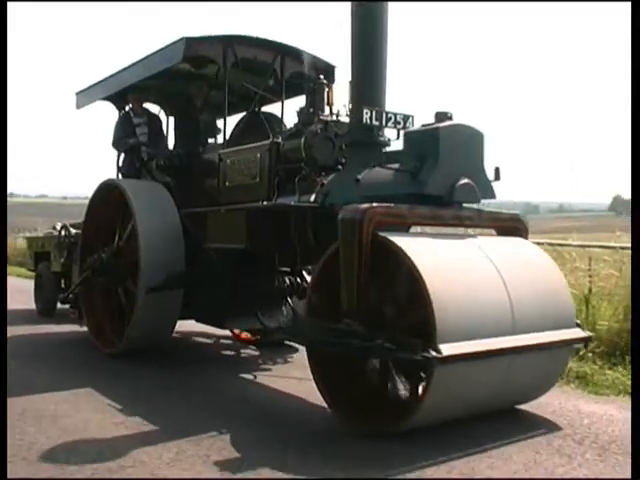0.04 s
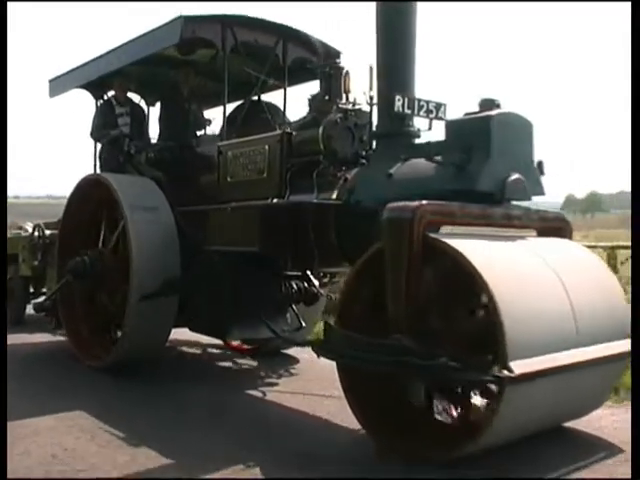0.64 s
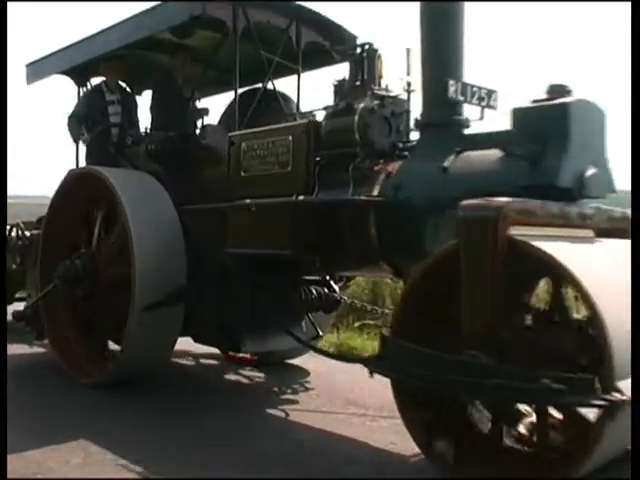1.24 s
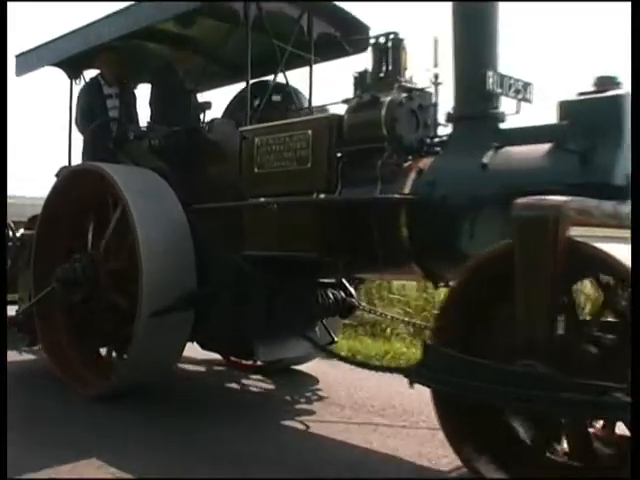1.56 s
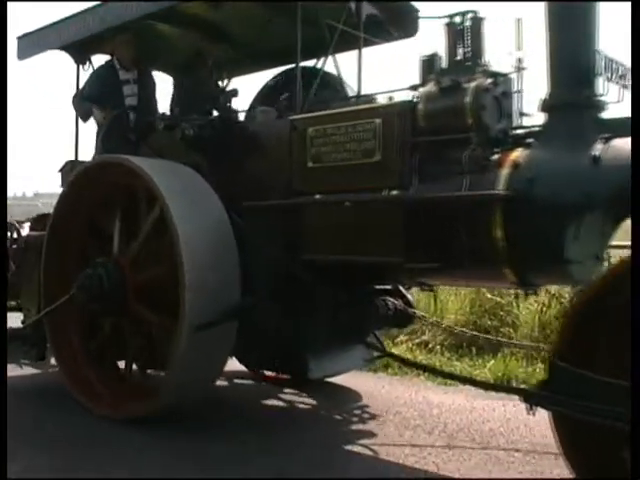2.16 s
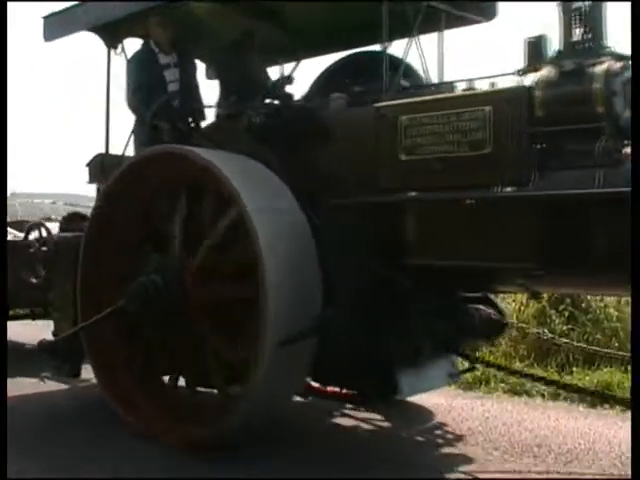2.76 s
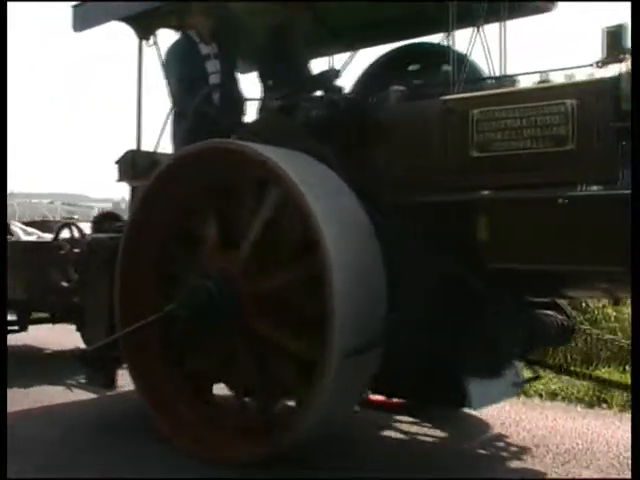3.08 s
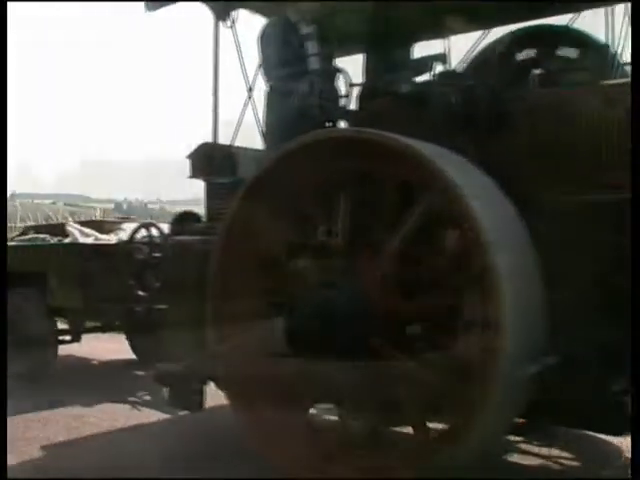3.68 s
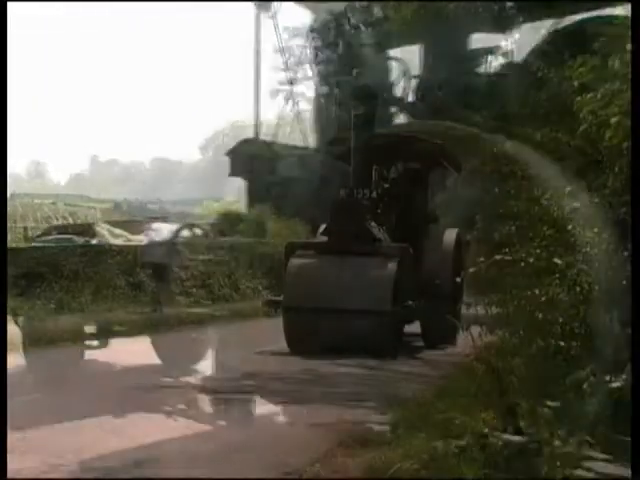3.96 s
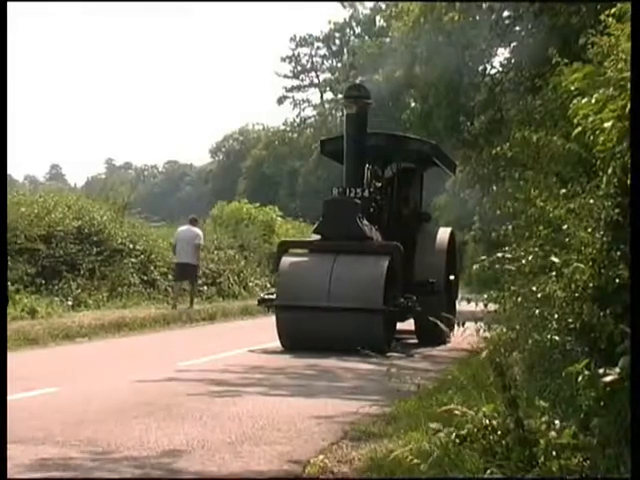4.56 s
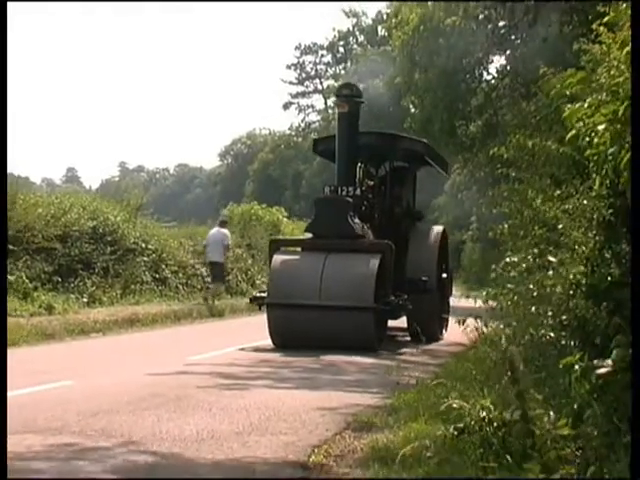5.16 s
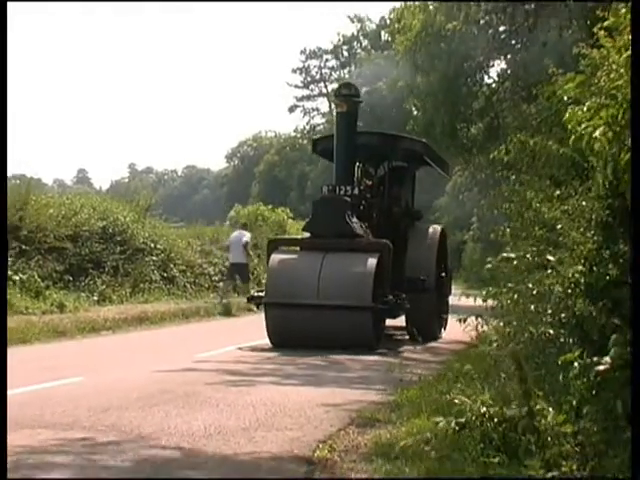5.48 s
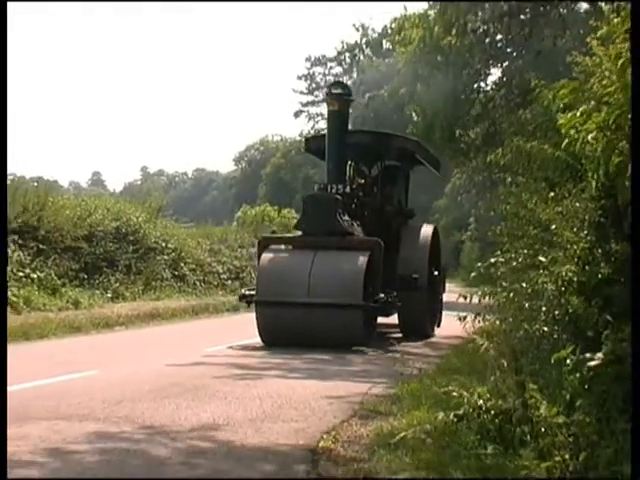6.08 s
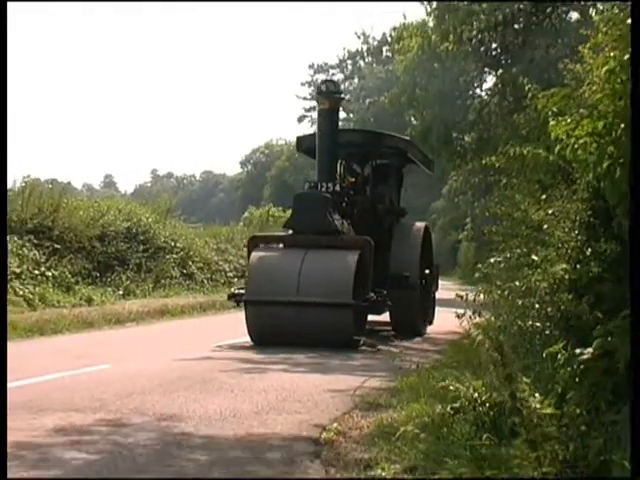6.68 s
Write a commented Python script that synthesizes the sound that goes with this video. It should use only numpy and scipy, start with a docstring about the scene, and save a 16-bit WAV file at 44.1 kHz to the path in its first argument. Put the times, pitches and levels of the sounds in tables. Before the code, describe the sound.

A steam roller is already passing close by on a country road. Its exhaust thumps and hisses in strong and weak pairs, about three and a half pairs a second. Open gears clatter and ring, rods knock in time, and iron rolls rumble on the asphalt. Between 0.4 and 1.7 seconds the front roll gives several hollow bumps, with two tiny stone snaps near 0.8 seconds. A gear wheel clangs at about 2.4 seconds. The gearing drifts slightly from left to right as the rear roll's low drone swells, peaking around 3.3 seconds, with hard metallic jolts at 3.0, 3.4 and 3.6 seconds. From about 3.7 to 4.4 seconds the sound cross-fades to the roller approaching from farther off. Clatter and rumble are quieter, while the slightly quicker chuffs carry a short echo from the hedges. The hiss grows a little near 5.7 seconds, and the rhythm continues until about 7 seconds.

```python
"""A steam roller passes close by on a country road. From the start, open gears clatter and chime, iron
rolls rumble on the asphalt and rods knock. Each turn of the crank gives a strong and a weak exhaust
beat that excite the chimney's resonances. The front roll bumps and cracks stones, a gear wheel clangs,
and the rear roll drones past amid hard jolts. Around 4 s a cross-fade leads to the roller approaching
from farther off, its exhaust echoed by the hedges."""
import sys
import numpy as np
from scipy import signal
from scipy.fft import rfft, irfft
from scipy.io import wavfile
from scipy.ndimage import uniform_filter1d

SR = 44100
rng = np.random.default_rng(int(sys.argv[2]) if len(sys.argv) > 2 else 0)


def generate_wav(signal):
    """Clip the signal to [-1, 1] and save it as 16-bit WAV at the path in sys.argv[1]."""
    frames = np.transpose(np.atleast_2d(signal))
    scaled = np.clip(frames, -1, 1) * 32767
    pcm = np.round(scaled).astype(np.int16)
    wavfile.write(sys.argv[1], SR, pcm)


N = 305613
TIME = np.arange(N) / SR
FADE_START_S, FADE_END_S = 3.65, 4.35  # from the near view to the far one
RETURN_SHARE = 0.456  # share of a turn at which the return stroke exhausts

# remoteness of the roller: t/s, distance (0 alongside to 1 down the road)
DISTANCE = [(0, 0.15), (3.6, 0.065), (4.4, 1), (6.93, 1)]
# strength of the running gear: t/s, clatter level/dB, rumble level/dB
RUNNING = [(0.0, -17.5, -21.5), (0.19, -24, -22.5), (1.93, -24, -20), (2.33, -21.5, -18.5),
           (3.57, -22, -21), (3.8, -23.5, -20), (4.5, -30.5, -29), (5.17, -29.5, -30.5), (6.62, -31, -29.5),
           (6.93, -29, -30)]
# spectrum of the clatter: f/Hz, level/dB
CLATTER = [(300, -24), (620, -23.5), (830, -2.5), (1100, 3), (1350, 1.5), (1570, 0.5), (1950, -5.5),
           (2550, -4), (2950, -4.5), (3450, -4.5), (4500, -13), (7000, -19.5), (11000, -25), (15500, -22.5)]
# modes of the gear wheels: f/Hz, level/dB, T60/s
GEAR_MODES = [(2575, 1.5, 0.055), (2720, -2.5, 0.014), (3320, 5, 0.017), (5525, -5, .026),
              (6355, -8.5, 0.026), (7845, -18.5, 0.06), (8790, -14, .02), (9530, -21, 0.055),
              (10490, -24.5, 0.065), (13435, -18, 0.036), (14670, -19.5, .04)]


def amp(db):
    return 10 ** (np.asarray(db) / 20)


def unit_rms(x):
    return x / np.sqrt(np.mean(x ** 2) + 1e-20)


def follow(rows, at, column=1):
    """Linear interpolation of one column of a table."""
    rows = np.array(rows)
    return np.interp(at, rows[:, 0], rows[:, column])


def add(mix, s, sound):
    """Superposition of a sound starting at s seconds."""
    part = mix[max(round(s * SR), 0):][:len(sound)]
    part += sound[:len(part)]


def colour(x, spectrum, size=4096):
    """Minimum-phase filtering by a spectrum of (f/Hz, level/dB)."""
    hz, db = np.transpose(spectrum)
    log_hz = np.log(abs(np.fft.fftfreq(size, 1 / SR)) + 1)
    log_gain = np.log(amp(np.interp(log_hz, np.log(hz), db)))
    taps = np.fft.ifft(np.exp(np.conj(signal.hilbert(log_gain)))).real
    return signal.fftconvolve(x, taps[:size // 2])[:len(x)]


def free_decay(t, modes, sustain=1):
    """Free vibration: a damped sinusoid for each mode (f/Hz, level/dB, T60/s)."""
    return sum(amp(db - 60 * t / (t60 * sustain)) * np.sin(2 * np.pi * hz * t) for hz, db, t60 in modes)


def ring(x, modes):
    """Forced vibration: convolution with the modes' unit-energy impulse response."""
    response = free_decay(TIME[:SR // 3], modes)
    return signal.fftconvolve(x, response / np.linalg.norm(response))[:len(x)]


def swell(t, rise, hold, fall):
    """Linear attack, then exponential decay from the time `hold`; all in seconds."""
    return np.clip(t / rise, 0, 1) * np.exp(-np.maximum(t - hold, 0) / fall)


def impacts(per_s, spread_db):
    """A Poisson train of blows of uneven size."""
    blows = (rng.random(N) < per_s / SR) * rng.choice([-1, 1], N)
    return blows * amp(spread_db * np.minimum(rng.exponential(1, N), 4))


def crank_times(turns):
    """Rotation with a drifting period: when the crank reaches these angles, near and far."""
    # near and far view: first strong beat t/s, period/s, drift/(s per turn squared)
    crank = [(0.0826, 0.2865, -0.00118), (4.0892, 0.2691, 0.00008)]
    return [first + turns * (period + drift * turns) for first, period, drift in crank]


def crank_turns(count=18):
    """Phase of the crank in turns, whole at each strong beat."""
    turns = np.arange(-1, count)
    near, far = (np.interp(TIME, times, turns) for times in crank_times(turns))
    return np.where(TIME < (FADE_START_S + FADE_END_S) / 2, near, far)


def strokes(share, count=18):
    """Periodic events at one share of a turn, cross-faded in power: (t/s, gain)."""
    rows = []
    near_power, far_power = [0.96, 0.01], [0.31, 0.69]  # before and after the fade
    for times, power in zip(crank_times(np.arange(count) + share), (near_power, far_power)):
        rows += zip(times, np.sqrt(np.interp(times, [FADE_START_S, FADE_END_S], power)))
    return [(s, gain) for s, gain in rows if gain > 0 and s < N / SR]


def gears(teeth=18, clatter_db=2.5, chime_db=-1, blow_spread_db=6, clink_spread_db=4):
    """Impact excitation: teeth meet with uneven force, rattling the casing and ringing the wheels."""
    # chime radiated towards the listener: t/s, level/dB relative to the clatter
    chime = [(0, -12), (1.2, -8.5), (2.4, -10), (3, -11.5), (3.7, -12), (4.2, -7), (4.6, -11.5), (6.93, -7)]
    turns = crank_turns()
    meetings = np.diff(np.floor(turns * teeth), prepend=0) > 0
    # the clatter swells twice a turn, dipping after each chuff, loudest at the weak beat
    surge = amp(0.2 * np.cos(4 * np.pi * (turns - 0.47))
                + 0.44 * np.cos(2 * np.pi * (turns - RETURN_SHARE)))
    rattle = swell(TIME[:SR // 10], rise=0.0013, hold=0.0094, fall=0.014)
    forces = (meetings * amp(db * np.clip(rng.standard_normal(N), -2, 2))
              for db in (blow_spread_db, clink_spread_db))
    blows, clinks = (unit_rms(signal.fftconvolve(force, rattle)[:N]) for force in forces)
    casing = unit_rms(colour(surge * (0.77 + blows) * impacts(per_s=9000, spread_db=0.5), CLATTER))
    # the wheels chime most when the clatter peaks
    wheels = unit_rms(ring(surge ** 3 * clinks * impacts(per_s=4000, spread_db=5), GEAR_MODES))
    guard_modes = [(1134, 0, 0.047), (1564, 2, 0.036), (1610, -2, 0.045)]  # sheet covers over the gears
    guards = unit_rms(ring(surge * blows * impacts(per_s=1500, spread_db=0), guard_modes))
    clatter = amp(-3.5) * casing + amp(-11.5) * guards
    # from the front, the boiler and roll screen part of the gearing
    screened = colour(clatter, [(500, 1), (1100, -6), (1700, 0.5), (2000, -3.5), (2700, 0),
                                (3400, 1), (5000, 2), (9000, 3), (15000, -4)])
    far = follow(DISTANCE, TIME)
    clatter = (1 - far) * clatter + far * screened
    wheels *= amp(follow(chime, TIME) + chime_db)
    return amp(follow(RUNNING, TIME) + clatter_db) * (clatter + wheels)


def rolls(ring_db=-3, far_ring_db=-3, bump_db=-6):
    """Rolling noise: crushed grit gives a broad rumble; the hollow drums resonate and boom at bumps."""
    # spectrum of the rumble on asphalt: f/Hz, level/dB
    road_spectrum = [(15, -38), (35, 2.5), (70, -0.5), (120, 4.5), (250, -3.5), (330, -12), (450, -13),
                     (620, -33.5), (1200, -38.5)]
    # modes of the rolls and frame: f/Hz, level/dB, T60/s
    drum_modes = [(99, -3, 0.18), (126.1, 1, 0.41), (210.7, -7.5, 0.22), (229.8, -1.5, 0.11),
                  (278.6, -2, 0.15), (368, -13, 0.21), (455, -23, 0.05)]
    # bumps under the front roll: t/s, level/dB
    bumps = [(0.437, -8.5), (0.793, -10), (0.908, -6.5), (0.968, -6), (1.374, -6), (1.664, -11.5)]
    road = unit_rms(colour(impacts(per_s=500, spread_db=1.5), road_spectrum))
    drums = unit_rms(ring(impacts(per_s=300, spread_db=0.5), drum_modes))
    drums *= amp(ring_db + far_ring_db * follow(DISTANCE, TIME))
    out = amp(follow(RUNNING, TIME, column=2)) * (road + drums)
    boom = free_decay(TIME[:SR // 5], drum_modes)
    boom = colour(boom, [(90, -34), (150, -10), (210, 5.5), (260, 2.5), (400, -12), (1500, -12)])
    for s, db in bumps:
        add(out, s, amp(db + bump_db) * boom / abs(boom).max())
    return out


def rear_roll():
    """Random forcing by grit sustains the resonances of the wide iron rim."""
    # drone of the tall roll going by: t/s, level/dB
    passage = [(0, -32), (2, -30), (2.7, -27), (3.3, -21.5), (3.9, -26), (4.4, -46.5), (6.93, -39.5)]
    # modes of the rim: f/Hz, level/dB, T60/s
    rim_modes = [(211.3, -6.5, 0.16), (278.5, 0.5, 0.23), (301, -3.5, 0.096), (360.4, -7, 0.12),
                 (400, -20, 0.54), (482, -13.5, 0.17), (518, -25.5, 0.06)]
    return amp(follow(passage, TIME)) * unit_rms(ring(impacts(per_s=400, spread_db=1.5), rim_modes))


def background(level_db=-35):
    """Stationary low-frequency noise: a deep outdoor rumble."""
    spectrum = [(12, -24), (35, 2), (70, -5), (150, -24), (700, -42), (3000, -60)]
    return amp(level_db) * unit_rms(colour(rng.standard_normal(N), spectrum))


def knocks(knock_db=-15, ring_db=1, spread_db=1, far_db=-6):
    """Backlash: slack in rods and gears closes in a burst of blows, thrice a turn and at each jolt."""
    # single jolts of frame and gearing: t/s, knock level/dB, gear ring level/dB
    jolts = [(0.039, -16.5, -25), (0.609, -19, -28), (3.005, -8, -20), (3.169, -23, -27), (3.394, 0, -20),
             (3.5556, 2, -17), (5.88, -14, -27)]
    # where slack closes: share of a turn, knock level/dB, gear ring level/dB (relative to the clatter)
    backlash = [(0.355, 20, 1), (0.46, 9, -1), (0.668, 11.5, -10)]
    body, chime, t = np.zeros(N), np.zeros(N), TIME[:SR // 8]
    blows = list(jolts)
    for share, db, chime_db in backlash:
        for s, gain in strokes(share):
            force_db = follow(RUNNING, s) + far_db * follow(DISTANCE, s) + 20 * np.log10(gain)
            force_db += spread_db * rng.standard_normal()
            blows.append((s, db + force_db, chime_db + force_db))
    for s, db, chime_db in blows:
        add(body, s, amp(db) * swell(t, rise=0.0072, hold=0.0024, fall=0.02))
        add(chime, s, amp(chime_db) * swell(t, rise=0.00023, hold=0.0074, fall=0.0058))
    body_noise, chime_noise = rng.standard_normal((2, N))
    knock = amp(knock_db) * body * unit_rms(colour(body_noise, CLATTER))
    return knock + amp(ring_db) * ring(chime * chime_noise, GEAR_MODES)


def beats(share, near_db, far_db, spread_db=0.5):
    """Periodic exhaust, one slightly uneven beat a turn: (t/s, thump, hiss and pipe ring level/dB)."""
    # exhaust at the listener: t/s, thump level/dB, hiss level/dB, blast pipe ring level/dB
    exhaust = [(0, -3.5, -24.5, -17.5), (1.2, -5, -26, -16), (2.2, -4, -26, -17.5), (3.35, -4.5, -30, -16),
               (3.75, -6.5, -32.5, -21.5), (4.5, -7.5, -31.5, -27.5), (5.7, -8.5, -25.5, -19.5),
               (6.93, -7, -27, -21)]
    rows = []
    for s, gain in strokes(share):
        db = near_db + (far_db - near_db) * follow(DISTANCE, s) + 20 * np.log10(gain)
        db += spread_db * rng.standard_normal()
        rows.append((s, *(follow(exhaust, s, column) + db for column in (1, 2, 3))))
    return rows


def thumps(strong, weak, round_trip_s=0.01333, overtone_hz=142, weak_trim_db=1.5):
    """Reflection in a pipe: each steam pulse runs up and down the chimney, fading and broadening."""
    out, early_s, lead_s = np.zeros(N), 0.02, 0.0041
    t = TIME[:SR // 5] - early_s
    # push, suction and rebound: amplitude, t/s, width/s
    lobes = ((0.68, -lead_s, 0.0013), (-1, 0, 0.0023), (0.48, 0.0031, 0.0018))
    # the chimney's second mode hums on after the pulse
    hum = -np.cos(2 * np.pi * overtone_hz * t) * swell(t + lead_s, rise=0.0022, hold=0.019, fall=0.035)
    for rows, trim_db in ((strong, 0), (weak, weak_trim_db)):
        for s, db, *_ in rows:
            far = follow(DISTANCE, s)
            reflection = 0.37 + 0.42 * far
            wave = (0.023 + 0.21 * far) * hum
            for trip in range(5):
                age, blur = t - trip * round_trip_s, 1 + 0.15 * trip
                pulse = sum(size * np.exp(-0.5 * ((age - at) / (width * blur)) ** 2)
                            for size, at, width in lobes)
                wave += reflection ** trip * pulse
            add(out, s - early_s, amp(db + trim_db) * wave)
    return out


def chuffs(strong, weak, pipe_db=2, far_pipe_db=2, weak_hiss_db=-27, gulp_db=-15, flutter_db=1):
    """Turbulent jet noise: escaping steam hisses and drives the modes of blast pipe and chimney."""
    # spectrum of the steam jet: f/Hz, level/dB
    steam_spectrum = [(100, -38), (350, 16), (560, -23.5), (850, 4), (1200, 6.5), (1450, -24), (2100, -7.5),
                      (2900, 8), (3700, 6), (4600, -1), (5800, -6), (7000, -6.5), (11000, -11), (15500, -9)]
    # cross modes of the chimney and blast pipe: f/Hz, level/dB, T60/s
    pipe_modes = [(834, -8, 0.088), (1044, -8.5, 0.064), (1250, -13, 0.046), (2541, 8, 0.045),
                  (2706, 7, 0.032), (3100, 3.5, 0.015), (3350, -1, 0.026), (3700, -26, .016),
                  (4200, -17, 0.021), (4870, -8.5, 0.033), (5730, -5.5, 0.036)]
    hiss, pipe, gulp = np.zeros((3, N))
    t = TIME[:SR // 4]
    valve_opening = np.sin(np.pi / 2 * np.clip(t / 0.013, 0, 1)) ** 2
    for s, _, jet_db, ring_db in strong:
        far = follow(DISTANCE, s)
        puff = valve_opening * swell(t, rise=0.002, hold=0.019, fall=0.024 + 0.0044 * far)
        add(hiss, s - 0.004, amp(jet_db + 7) * puff)
        drive = amp(ring_db + far_pipe_db * far) * swell(t, rise=0.009, hold=0.016, fall=0.014)
        add(pipe, s + 0.00044, drive)
    for s, db, *_ in weak:
        add(hiss, s, amp(db + weak_hiss_db) * swell(t, rise=0.015, hold=0.019, fall=0.15))
    # a low gulp of turbulence in the chimney follows every beat
    for s, db, *_ in strong + weak:
        add(gulp, s, amp(db) * swell(t, rise=0.0093, hold=0.027, fall=0.017))
    jet_noise, pipe_noise, gulp_noise, flutter_noise = rng.standard_normal((4, N))
    flutter = unit_rms(amp(flutter_db * unit_rms(uniform_filter1d(flutter_noise, size=90))))
    jet = hiss * flutter * unit_rms(colour(jet_noise, steam_spectrum))
    # directivity: the chimney mouth beams its upper modes over a near listener's head
    beamed = colour(jet, [(300, -1.5), (600, -11), (850, 0), (1500, 3), (3500, 2),
                          (5600, 4.5), (7000, 2), (15000, -1)])
    far = follow(DISTANCE, TIME)
    jet = (1 - far) * jet + far * beamed
    pipe_ring = ring(pipe * flutter * pipe_noise, pipe_modes)
    chimney = ring(gulp_noise, [(36, -11, 0.33), (77, 17, 0.041), (133.4, 6, 0.1), (231, -38, 0.04)])
    return jet + amp(pipe_db) * pipe_ring + amp(gulp_db) * gulp * unit_rms(chimney)


def hedge_echoes(x, level_db=-8.5, t60=0.22, size=9000):
    """Diffuse reflection: the hedges return a decaying tail, stronger when the source is far off."""
    tail = rng.standard_normal(size) * amp(-60 * TIME[:size] / t60)
    echoes = signal.fftconvolve(x, tail / np.linalg.norm(tail))[:N]
    return amp(level_db) * follow(DISTANCE, TIME) * echoes


def cracks(crack_db=-8):
    """Brittle fracture: a stone splits under the roll with a tiny bright snap."""
    # splitting stones: t/s, level/dB
    stones = [(0.815, -15.5), (0.854, -15)]
    envelope = np.zeros(N)
    snap = swell(TIME[:SR // 30], rise=0.0004, hold=0.001, fall=0.0036)
    for s, db in stones:
        add(envelope, s, amp(db + crack_db) * snap)
    bright_noise = colour(rng.standard_normal(N), [(2000, -18), (5000, 5), (8000, 0), (15000, -20)])
    return envelope * unit_rms(bright_noise)


def clangs():
    """Free vibration: after one clean blow a wheel rings longer than with its teeth engaged."""
    # hard blow on a gear wheel: t/s, peak level/dB
    blows = [(2.411, -6)]
    out, t = np.zeros(N), TIME[:SR // 5]
    wheel = free_decay(t, GEAR_MODES, sustain=1.1) * np.clip(t / 0.015, 0, 1)
    for s, db in blows:
        add(out, s, amp(db) * wheel / abs(wheel).max())
    return out


def stereo(overhead, ground, overhead_share=0.59, centre_hz=570, q=1.87, top_hz=1400):
    """Mid-side stereo: a stereo widener spreads the low mids, leaning right; scattering adds width."""
    # scatter from road and hedges: f/Hz, level/dB relative to the direct sound
    scatter_spectrum = [(40, -14), (150, -11.5), (300, -20), (450, -7.5), (620, 7), (900, -10.5),
                        (2500, -8), (3500, -9.5), (5200, -3.5), (8000, -14), (15000, -12)]
    mid, hz = overhead + ground, np.fft.rfftfreq(N, 1 / SR) + 1
    band_pass = 1 / (1 + 1j * q * (hz / centre_hz - centre_hz / hz))
    side = -irfft(rfft(mid) * band_pass / (1 + 1j * hz / top_hz), N)
    side -= 0.045 * mid  # the right capsule is a little more sensitive
    # scattered sound comes most from the low machinery and arrives with random phase
    scattered = colour(ground + overhead_share * overhead, scatter_spectrum)
    frames = signal.stft(scattered, nperseg=512)[2]
    frames *= np.exp(2j * np.pi * rng.random(frames.shape))
    side += signal.istft(frames, nperseg=512)[1][:N]
    return np.array([mid + side, mid - side])


def scene():
    """Superposition of the exhaust at the chimney top and the gearing and rolls below it."""
    # the gearing drifts from left to right as it goes by: t/s, left minus right level/dB
    bearing = [(0, 2.5), (1.8, 2), (2.8, 0.5), (3.8, -1.5), (4.5, 0), (6.93, 0.5)]
    strong = beats(0, near_db=0, far_db=0)
    weak = beats(RETURN_SHARE, near_db=-3.5, far_db=-5.5)
    steam = chuffs(strong, weak)
    hedges = hedge_echoes(steam)
    gearing = gears() + knocks() + clangs()
    overhead = thumps(strong, weak) + steam + hedges
    ground = gearing + rolls() + rear_roll() + cracks() + background()
    lean_db = follow(bearing, TIME) / 2
    return stereo(overhead, ground) + (amp([lean_db, -lean_db]) - 1) * gearing


def record(dry, ceiling=0.8, edge_hz=15650):
    """The microphone passes no steady pressure; soft saturation rounds peaks; a low-pass ends the band."""
    dry = signal.lfilter(*signal.butter(1, 8, "highpass", fs=SR), dry)
    rounded = dry / (1 + (dry / ceiling) ** 6) ** (1 / 6)
    low_pass = signal.firwin(511, edge_hz, window=("kaiser", 9), fs=SR)
    return signal.oaconvolve(rounded, low_pass[None], "same")


dry = scene()
out = record(dry)
generate_wav(out)
```